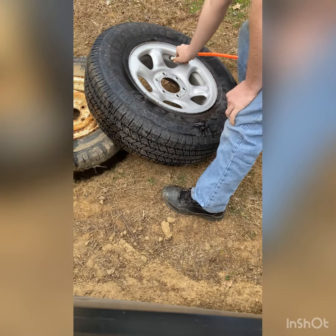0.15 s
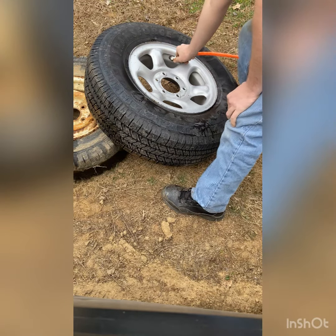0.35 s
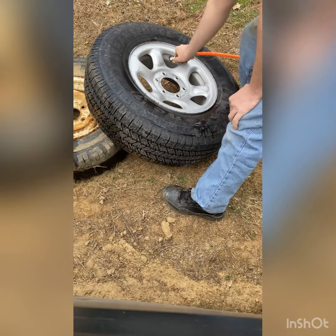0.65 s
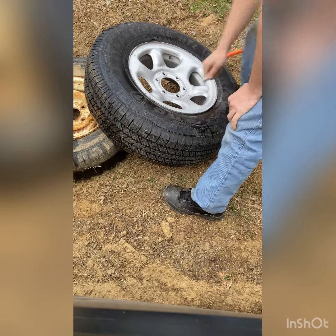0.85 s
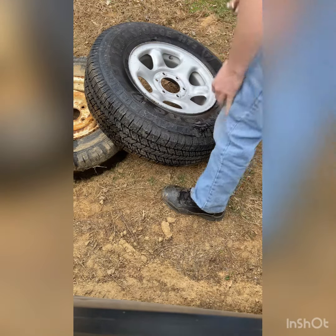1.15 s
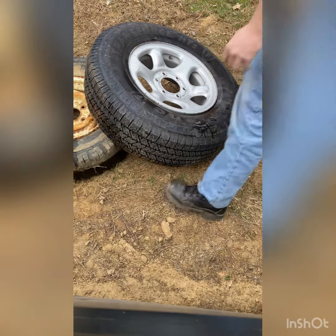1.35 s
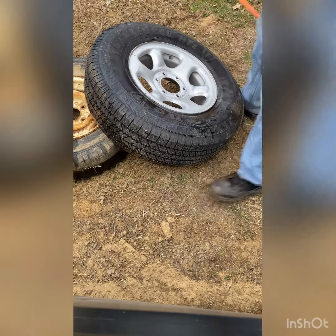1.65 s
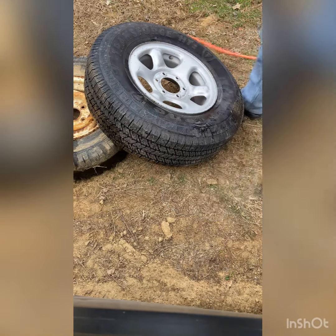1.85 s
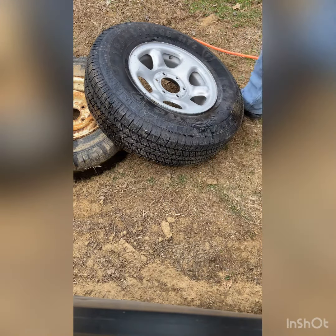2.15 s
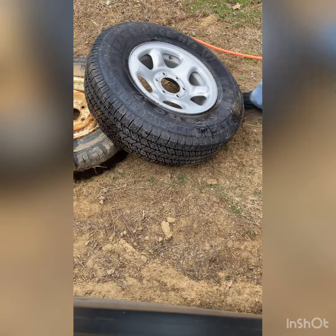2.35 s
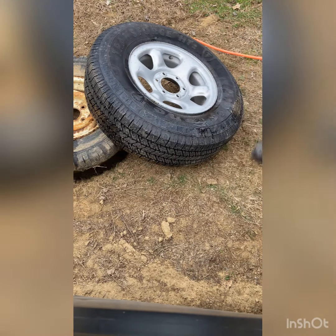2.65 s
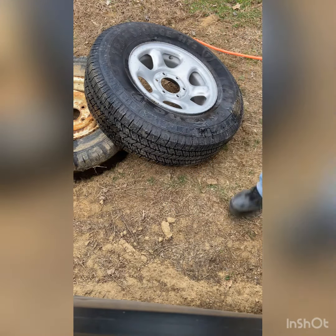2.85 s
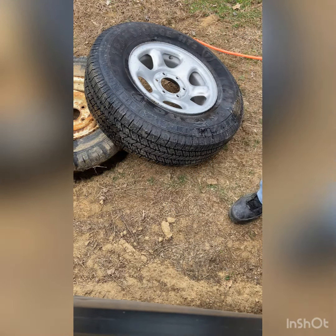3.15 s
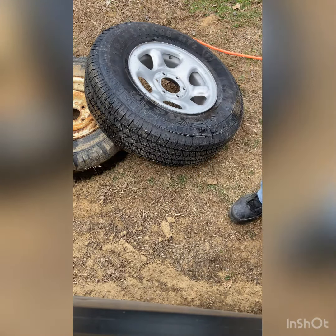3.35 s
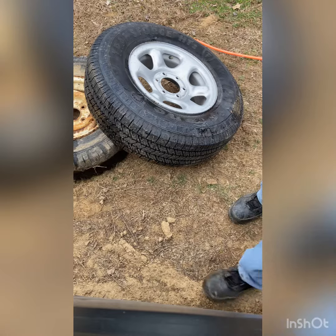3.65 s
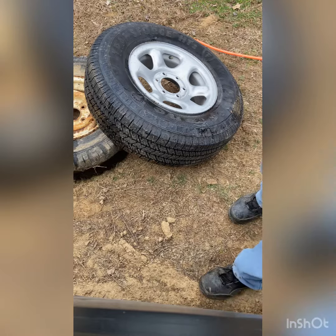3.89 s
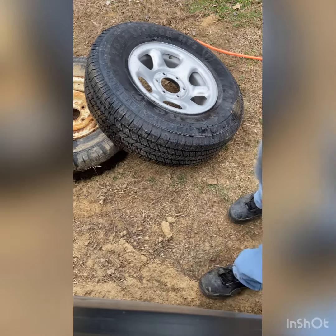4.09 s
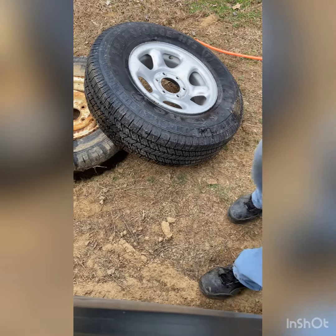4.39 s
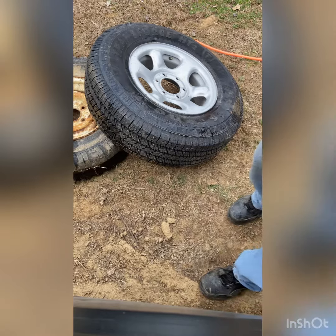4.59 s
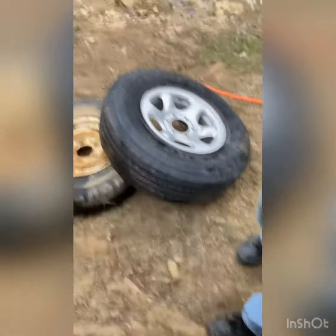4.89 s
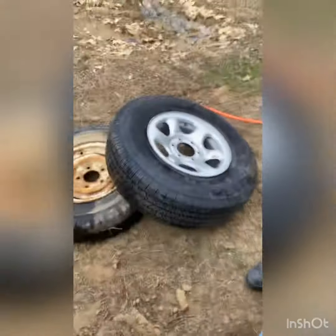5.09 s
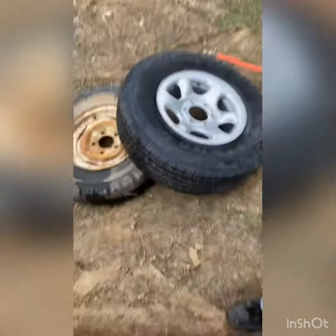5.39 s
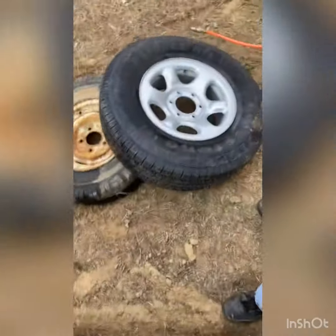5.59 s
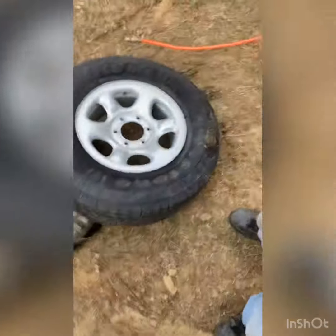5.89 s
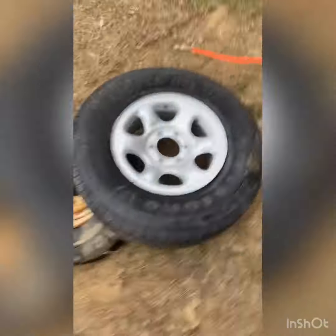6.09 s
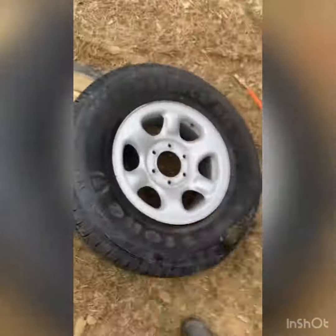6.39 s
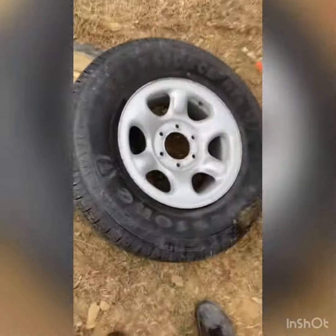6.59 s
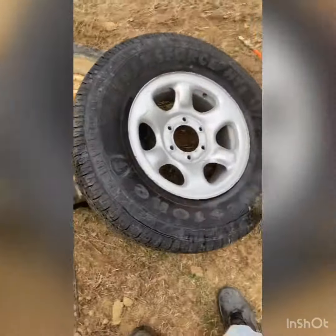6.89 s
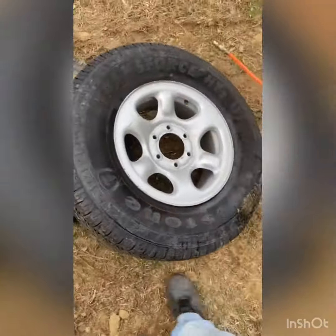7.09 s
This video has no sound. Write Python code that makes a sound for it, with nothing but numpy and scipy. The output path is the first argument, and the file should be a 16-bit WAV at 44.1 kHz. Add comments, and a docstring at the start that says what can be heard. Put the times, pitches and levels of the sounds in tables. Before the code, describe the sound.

A close handheld stereo pickup hears a tire being filled: thin high hiss, then an abrupt pop with a hollow thump and short rim ring, briefly ducking everything. The compressor's rapid, droning chug dominates from start to end. Sparse gritty footsteps and thin metallic squeals follow. The microphone then bumps and rumbles as it is carried, the tone sweeps hollow, and the motor's rattle turns brighter and more clacking.

```python
"""A piston air compressor thuds steadily: crank-timed pulses boom in pipe and tank, with puffs and metal rattle.
Air hisses and whistles through a tire valve (shaped noise) until the chuck comes off with a pop:
a short spit of noise, a kick of damped tones and a ringing rim, which make the gain control duck.
Grit ticks under shoes and hose, with bumps and rumble as the microphones are carried over the tire.
There the compressor sounds harder, and its loose parts whine, squeal and clack."""
import sys
import numpy as np
from scipy import signal
from scipy.fft import rfft, irfft
from scipy.io import wavfile
from scipy.ndimage import uniform_filter1d, minimum_filter1d, map_coordinates

SR = 44100
rng = np.random.default_rng(int(sys.argv[2]) if len(sys.argv) > 2 else 0)


def pcm_store(signal):
    """Save signal as 16-bit PCM."""
    levels = np.round(np.clip(np.atleast_2d(signal), -1, 1) * 32767)
    wavfile.write(sys.argv[1], SR, levels.astype(np.int16).T)


N = 319284
T = np.arange(N) / SR  # time in seconds
HZ = np.fft.rfftfreq(N, 1 / SR)

# In all tables, spread_s is the standard deviation of a bell-shaped swell, and
# width_hz is how far from its pitch a resonance has dropped by 6 dB.

# grit under shoes and hose: start_s, level_db, decay_s
GRIT_TICKS = [(1.243, -49.5, 0.0046), (1.748, -38.5, 0.0062), (1.81, -44, 0.0045), (1.824, -45, .007),
              (2.349, -50.5, .012), (2.89, -47, .005), (3.822, -47, 0.0034), (5.98, -54, .02),
              (6.398, -47.5, .008)]
# tone colour of the grit: pitch_hz, level_db (per Hz)
GRIT_COLOUR = [(1500, -15), (4000, -4), (7000, -12), (11000, -7), (14000, -7), (16000, -14)]
# soft bumps as the microphones are carried: middle_s, level_db, pitch_hz, spread_s
BUMPS = [(4.823, -25, 70, 0.019), (4.829, -27, 159, 0.01), (4.909, -24.5, 138, 0.0077),
         (4.988, -20, 125, 0.0047), (5.06, -22, 121, 0.006), (5.145, -26, 161, 0.011),
         (6.265, -26, 145, 0.0072), (6.35, -26, 79, 0.0079), (6.42, -33, 65.4, 0.021),
         (6.503, -28, 108.8, 0.0028)]
# tone colour of the handling rumble: pitch_hz, level_db (per Hz)
RUMBLE_COLOUR = [(20, -28), (32, -12), (45, -1), (75, 0), (150, -3.5), (220, -5.5), (400, -9), (800, -16),
                 (2000, -59)]
# spells of rumble from air and hands: start_s, end_s, fade_in_s, fade_out_s, level_db
RUMBLE_SPELLS = [(3.98, 4.2, 0.1, 0.14, -49), (4.68, 6.55, 0.15, 0.099, -42.5),
                 (4.78, 5.03, 0.06, 0.13, -37), (6.23, 6.42, 0.05, 0.12, -38)]
RUMBLE_REST_DB = -55  # a faint rumble throughout
# small knocks and clinks: middle_s, level_db, pitch_hz, width_hz, spread_s
CLINKS = [(2.344, -52, 2570, 50, .014), (2.64, -53, 2680, 50, .01), (2.69, -52, 2560, 50, .01),
          (4.585, -45, 2600, 80, .007), (4.664, -50, 4470, 500, .002), (4.69, -40, 785, 220, 0.005),
          (6.245, -44, 2610, 80, .02)]
KNOCK = (4.6815, -23.5, 800, 0.022)  # a dull knock nearby: start_s, level_db, pitch_hz, t60_s

# air through the tire valve: pitch_hz, level_db (per Hz)
VALVE_AIR = [(1500, -17), (3000, -2), (4300, -12), (5400, 5), (6500, -9), (8500, -9), (10800, -4.5),
             (12500, -9), (16000, -18)]
# whistles of the valve: pitch_hz, width_hz, level_db
WHISTLES = [(4170, 42, 0), (5030, 130, -2), (9700, 45, -6), (10643, 35, -10), (11300, 10, 0),
            (14360, 49, -5)]
RELEASE_S = 0.594  # when the chuck comes off
# spit of air as the chuck comes off: pitch_hz, level_db (per Hz)
SPIT_COLOUR = [(500, -21), (1400, 1), (1850, 1.5), (2250, 0.5), (2800, -1), (4000, -9.5), (5500, 2),
               (7200, -11), (8800, -6.5), (10100, 3.5), (11500, -1.5), (13300, 1), (16000, 0.5)]
# the kick of the air in tire and rim: pitch_hz, level_db, delay_s, rise_s, t60_s
TIRE_KICK = [(130, -12, 0.0034, 0.0088, 0.057), (226, 9.5, 0.00464, 0.0044, 0.019),
             (427, -20, .007, 0.0037, .04), (737, -4, 0.00286, 0.0015, 0.021),
             (894, -3, 0.00304, 0.00095, 0.015), (1450, -17, 0.00417, .0005, 0.015),
             (616, -23, 0.0041, 0.011, 0.12)]
# the rim rings on after the pop: pitch_hz, width_hz, level_db
RIM_RING = [(584, 71, -6), (920, 330, -7)]
RIM_DB, RIM_T60_S = -20, 0.093

# lines of the piston stroke, beside the tire and above it: multiple of the crank speed, level_db
STROKE_BESIDE = [(1, -44), (2, -2), (3, -11.5), (4, -6), (5, -0.5), (6, -11.5), (7, 2), (8, 5.5), (9, -7),
                 (10, -5), (11, -7.5), (12, -18), (13, -4.5), (14, -14.5), (15, -24), (16, -12.5),
                 (17, -14), (18, -24), (19, -22.5), (20, -28.5), (21, -12.5), (22, -37), (23, -13.5),
                 (24, -37.5), (25, -24.5), (26, -14), (27, -23), (28, -26), (29, -11), (30, -18), (31, -15),
                 (32, -22.5), (33, -33), (34, -20), (35, -32), (38, -38.5), (41, -23.5), (42, -24.5),
                 (43, -18), (44, -31), (45, -28.5)]
STROKE_ABOVE = [(1, -30), (2, -1), (3, -8), (4, -5), (5, 2.5), (6, -10), (7, -16), (8, -1.5), (9, -8),
                (10, -6.5), (11, -10), (12, -10.5), (13, 7), (14, -5), (15, -3.5), (16, -5), (17, -8.5),
                (18, -31), (19, -22), (20, -17), (21, -4), (22, -18), (23, -8), (24, -8.5), (25, -20),
                (26, -10), (27, -10), (28, -5), (29, -14), (30, -16.5), (31, -15), (32, -12), (36, -22),
                (40, -21), (41, -14.5), (42, -13.5), (44, -35), (45, -6.5), (46, -39), (47, -30)]
# uneven, breathy part of the strokes: pitch_hz, level_db (per Hz)
PUFF_BESIDE = [(30, -11), (60, -17), (120, -6.5), (210, -4.5), (265, 3.5), (330, 5), (400, -2),
               (470, -24.5), (620, -17.5), (1200, -57.5)]
PUFF_ABOVE = [(30, 5), (80, -6), (150, -14), (230, 2), (320, 14), (380, 23), (470, 10.5), (620, -5),
              (1200, -55)]
# valve and housing clatter: pitch_hz, level_db (per Hz)
CLATTER_BESIDE = [(300, -1.5), (500, -4), (630, -0.5), (720, 5.5), (1030, 1), (1270, -1.5), (1470, -0.5),
                  (1750, -8), (2500, -11.5), (3200, -22.5), (7000, -34.5)]
CLATTER_ABOVE = [(300, -23), (500, -17), (620, -5), (730, 3.5), (980, -10.5), (1220, -5.5), (1400, 0),
                 (1580, -2), (1750, -5), (2500, -8.5), (3200, -15.5), (7000, -51)]
# airy upper part of the rattle: pitch_hz, level_db (per Hz)
AIRY_COLOUR = [(1200, -3), (2500, -1), (3150, -0.5), (3800, 2.5), (4700, 0), (5700, -4.5), (7000, -15),
               (10500, -9.5), (12800, -14), (16000, -30)]
# ringing of the metal housing: pitch_hz, width_hz, level_db
HOUSING = [(2074, 117, 0.5), (2316, 100, -6), (2470, 220, -2.5)]
# spells of housing ring: start_s, end_s, fade_in_s, fade_out_s, level_db
HOUSING_SPELLS = [(2.33, 7.1, 0.12, 0.9, -59.5), (3.8, 6, 0.42, 0.45, -55)]
# loose metal parts whine: start_s, end_s, fade_in_s, fade_out_s, level_db, pitch_hz, width_hz
WHINES = [(-0.5, 1.8, .1, .47, -62, 3790, 30), (-0.5, 1.8, .1, .47, -63, 4325, 35),
          (2.8, 3.05, .1, .1, -65, 3330, 30), (3.0, 6.0, .1, .8, -64.5, 3670, 60),
          (3.3, 7.5, .8, .1, -67, 3530, 30), (5.7, 7.5, .4, .1, -62.5, 3570, 35),
          (6.4, 7.5, .2, .1, -62, 3715, 35), (3.7, 6.7, .4, .2, -65, 2880, 45),
          (6.75, 7.5, .1, .1, -58, 2865, 30), (2.32, 2.85, .04, .3, -62, 2560, 45),
          (6.3, 7.5, .3, .1, -61, 4200, 300)]
# spells of squealing, and of its fainter upper note: start_s, end_s, fade_in_s, fade_out_s, level_db
SQUEAL_SPELLS = [(2.47, 6.6, 0.05, 0.6, -57.5), (2.48, 2.6, 0.03, 0.05, -59.5),
                 (2.8, 3.02, 0.06, 0.06, -60), (3.77, 4.12, 0.1, 0.1, -62), (5.28, 5.45, 0.06, 0.08, -58),
                 (6.16, 6.28, 0.06, 0.02, -51), (6.215, 6.275, 0.02, 0.02, -49),
                 (6.32, 6.42, 0.02, 0.05, -47.5)]
UPPER_SPELLS = [(3.75, 6.05, 0.15, 0.1, -60), (6.3, 6.43, 0.05, 0.06, -55)]
# scraping noise in the squeal: pitch_hz, width_hz, level_db
SQUEAL_RING = [(2385, 42, -1), (2576, 63, -7.5)]
SQUEAL_ORDER, UPPER_ORDER = 70, 76  # multiples of the crank speed
# valves and loose parts clack once a revolution: start_s, end_s, fade_in_s, fade_out_s, level_db,
# place in the turn (0-1), pitch_hz, width_hz
CLACKS = [(5.32, 7.6, .4, .1, -49, .24, 952, 68), (5.9, 6.56, 0.41, .3, -45.5, .24, 1020, 53),
          (5.99, 7.6, 0.42, .1, -48, .26, 1520, 66), (5.9, 7.6, 0.75, .1, -47.5, .7, 724, 64),
          (3.99, 5.88, 0.34, .5, -59.5, .36, 3680, 44), (3.9, 5.3, .15, 0.45, -57, 0.18, 2600, 60),
          (4, 6, .3, .3, -60, 0.2, 2070, 66)]
WHINE_FLICKER_DB, CLACK_UNEVEN_DB = 1.4, 1.2

# the crank slows steadily as the tank's pressure builds
CRANK_HZ, SAG_HZ_PER_S, START_TURN = 34.46, 0.056, 0.018
# moves of the microphones: middle_s, duration_s
LIFT = (4.9, 1.0)  # raised from beside the tire
CROSS = (5.81, 1)  # passing over the tire
SETTLE = (6.06, 0.26)  # coming into full view of the clatter
THUD_DB, LIFT_DB, SETTLE_DB = -28.5, -2, -0.1  # the thud at first, and what the moves add
CLATTER_DB, CLATTER_SETTLE_DB = -42.5, 7
AIRY_DB, AIRY_SETTLE_DB = -49.5, -2
SLAP_DB = -3  # clatter above the tire against clatter beside it
# a worker near the microphones shades the upper range: start_s, end_s, fade_in_s, fade_out_s
SHADE = (2.13, 5.68, 1.8, 1.6)
SHADE_CLATTER_DB, SHADE_AIRY_DB = -2, -6
REBOUND_DB, REBOUND_TURN = -16, 0.2  # a weaker pulse, this share of a turn after each stroke
TANK_RING = 1.15  # weight of the tank's ringing against the pipe's direct boom
# how often the echoes change: at rest, and the extra once the microphones are lifted
WANDER_PER_S, WANDER_CARRIED_PER_S = 1.597, 3.43

# a reflection dips one band, which slides down: time_s, centre_hz, depth_db (negative lifts the band)
HOLLOW = [(3.62, 1410, -1), (3.9, 1370, 5.5), (4.95, 1280, 2), (5.18, 1090, -0.5), (5.3, 815, 6),
          (5.4, 573, 13), (5.52, 407, 5.5), (5.75, 325, 1.5), (6.03, 274, 11), (6.25, 260, 2),
          (6.5, 237, -2.5)]
HOLLOW_OCTAVES = 0.23  # standard deviation
# during the crossing it also lifts a band above the dip: start_s, end_s, fade_in_s, fade_out_s
CREST_SPELL = (5.33, 5.6, 0.16, 0.3)
CREST_RATIO, CREST_DB, CREST_OCTAVES = 2.4, 2.5, 0.099
# narrow bands of the compressor's sound swell and sink: start_s, end_s, centre_hz, change_db;
# a row that ends before it starts does nothing
BAND_WAVERS = [(2.0, 2.73, 444, 5.5), (3.0, 3.97, 465, 7.5), (0, 0.9, 416, -4.5), (2.5, 3.3, 658, 9.5),
               (2.5, 3.6, 1080, 5), (3.5, 5.1, 885, -5), (0.5, 2.34, 1478, 4), (-1, 0.88, 1455, 6),
               (1.5, 2.3, 2400, 4), (9, 6.6, 2100, 14)]
WAVER_WIDTH_HZ, WAVER_FADE_S = 27, 0.68

# how alike the two microphones hear: pitch_hz, likeness (held within -1 to 1)
LIKENESS = [(60, 2.3), (150, 0.7), (290, 1.13), (640, -0.35), (1400, 0.84), (3100, 0.6), (7000, 0.65),
            (15000, 10.8)]
# phase between left and right, as the phone widens the stereo: pitch_hz, left's lead in radians
STEREO_PHASE = [(20, 0), (100, -.05), (300, -.25), (650, -.45), (1400, 0), (3300, .8), (5300, 0),
                (6200, .8), (6900, 3), (8000, 3.3), (8600, 6), (12000, 6.5), (12800, 9.3), (14300, 9.6),
                (15200, 12.4)]
# balance of the two sides: pitch_hz, left minus right in dB
BALANCE = [(100, 0), (250, -0.6), (700, -2.4), (1200, -2.6), (2400, -1.3), (4000, 0.1)]
EDGE_HZ = 15900  # upper limit of the sound


def amp(db):
    """Turns decibels into gain."""
    return 10 ** (np.asarray(db) / 20)


def unit(x):
    """Scales a sound to rms 1."""
    return x / np.sqrt(np.mean(x ** 2) + 1e-20)


def read(points, hz=HZ):
    """Reads a table in between its points, over log frequency."""
    f, value = np.transpose(points)
    return np.interp(np.log(hz + 1), np.log(f + 1), value)


def causal(db):
    """Gives the response with these levels that rings after a blow, never before it."""
    log_gain = np.log(amp(np.concatenate([db, db[-2:0:-1]])))
    return np.exp(np.conj(signal.hilbert(log_gain)))[:len(db)]


def colour(x, spectrum):
    """Filters by a spectrum, keeping the power of white noise."""
    response = causal(read(spectrum))
    response = response / np.sqrt(np.mean(abs(response) ** 2))
    return irfft(rfft(x) * response, N)


def ring(x, modes):
    """Passes a sound through steep resonances; rms 1."""
    response = sum(amp(db) / np.sqrt(width) / (1 + 1j * (HZ - hz) / width) ** 2
                   for hz, width, db in modes)
    return unit(irfft(rfft(x) * response, N))


def pair(two):
    """Makes two unrelated sounds as alike as the two microphones hear them."""
    a, b = rfft(two)
    same = np.clip(read(LIKENESS), -1, 1)
    return irfft(np.array([a, same * a + np.sqrt(1 - same ** 2) * b]), N)


def noise():
    """Makes white noise at the two microphones."""
    return pair(rng.standard_normal((2, N)))


def drift(count):
    """Wanders slowly by chance through count points; rms 1."""
    return unit(np.interp(T, np.linspace(0, T[-1], count), rng.standard_normal(count)))


def move(middle_s, duration_s):
    """Changes smoothly from 0 to 1."""
    return .5 + .5 * np.sin(np.pi * np.clip((T - middle_s) / duration_s, -.5, .5))


def spell(start_s, end_s, rise_s, fall_s):
    """Fades in, holds at 1 and fades out."""
    return move(start_s, rise_s) * (1 - move(end_s, fall_s))


def spells(rows):
    """Gives the gain of a sound that comes and goes."""
    return sum(amp(db) * spell(start, end, rise, fall) for start, end, rise, fall, db in rows)


def swell(middle_s, spread_s):
    """Rises and falls once, in a bell shape."""
    return np.exp(-.5 * ((T - middle_s) / spread_s) ** 2)


def knock(start_s, db, hz, t60):
    """Sounds one short, damped ring, falling 60 dB in t60 seconds."""
    t = np.maximum(T - start_s, 0)
    return amp(db - 60 * t / t60) * np.sin(2 * np.pi * hz * t)


def handling():
    """Grit ticks in sudden bursts of noise, low noise rumbles, soft tones bump and small things clink."""
    ticks = sum(amp(db) * (T >= s) * np.exp(-abs(T - s) / decay) for s, db, decay in GRIT_TICKS)
    grit = colour(noise() * ticks, GRIT_COLOUR)
    bumps = sum(amp(db) * swell(s, spread) * np.cos(2 * np.pi * hz * (T - s))
                for s, db, hz, spread in BUMPS)
    rumble_gain = (amp(RUMBLE_REST_DB) + spells(RUMBLE_SPELLS)) * amp(1.0 * drift(count=130))
    # some of the rumble arises separately at each microphone
    rumble = rumble_gain * colour(noise() + 0.25 * rng.standard_normal((2, N)), RUMBLE_COLOUR)
    grain = rng.standard_normal(N)
    clinks = sum(amp(db) * swell(s, spread) * ring(grain, [(hz, width, 0)])
                 for s, db, hz, width, spread in CLINKS)
    return grit + bumps + rumble + clinks


def filling():
    """Air hisses and whistles through the valve until the chuck lifts."""
    flow = np.clip((RELEASE_S - T) / 0.0028, 0, 1)
    hiss = amp(-51.5) * colour(noise(), VALVE_AIR)
    whistle = amp(-54.5) * ring(noise(), WHISTLES)
    return flow * (hiss + whistle)


def release():
    """The chuck spits a few milliseconds of air, whose push then kicks the tire and rings the rim."""
    age = np.maximum(T - RELEASE_S, 0)
    air = unit(noise() + 0.38 * rng.standard_normal((2, N)))  # the rim scatters it differently to each side
    u = age / 0.0022
    burst = u * np.exp(1 - u)
    tail = amp(-18.5) * (age > 0) * np.exp(-age / 0.02)
    spit = colour(air * (burst + tail), SPIT_COLOUR)
    kick = sum(knock(RELEASE_S + delay, db, hz, t60) * (1 - np.exp(-np.maximum(age - delay, 0) / rise))
               for hz, db, delay, rise, t60 in TIRE_KICK)
    t = np.maximum(age - .0042, 0)  # the rim starts a little later
    rim = amp(RIM_DB - 60 * t / RIM_T60_S) * (1 - np.exp(-t / 0.0023)) * ring(noise(), RIM_RING)
    return amp(-10.5) * spit + amp([[1], [-1]]) * kick + rim  # the kick is 2 dB stronger on the left


def echoes(size, count=32):
    """Draws chance strengths and phases of each line, one row for each arrangement of the echoes."""
    return rng.standard_normal((count, size, 2)) @ np.array([1, 1j]) / np.sqrt(2)


def each_turn(lines, turns, size=4096):
    """Plays a revolution over and over, gliding through its versions (rows) as the echoes change."""
    version = np.cumsum(WANDER_PER_S + WANDER_CARRIED_PER_S * move(*LIFT)) / SR
    waves = irfft(lines, size)
    return unit(map_coordinates(waves, [version, turns % 1 * size], order=1, mode="nearest"))


def gate(turns, at, length, rest):
    """Opens once a revolution and dies away to a resting level; at and length are shares of a turn."""
    return unit(rest + np.exp(-((turns - at) % 1) / length))


def rattle(turns, alike, size=220, count=46):
    """Metal knocks partly repeat each revolution, from line number count upward, and partly differ."""
    repeating = [each_turn(echoes(size) * (np.arange(size) >= count), turns) for side in range(2)]
    return pair(alike * np.array(repeating) + rng.standard_normal((2, N)))


def clacks(turns):
    """One short blow a revolution rings each part, with uneven strength."""
    total = 0
    for start, end, rise, fall, db, at, hz, width in CLACKS:
        blows = gate(turns, at, 0.0036, 0) * amp(CLACK_UNEVEN_DB * drift(count=260))
        total = total + spell(start, end, rise, fall) * amp(db) * ring(blows, [(hz, width, 0)])
    return total


def squeal(turns, order):
    """A fluttering note on a multiple of the crank speed, which catches and lets go."""
    flutter_db = 2.4 * drift(count=260) + 0.8 * drift(count=55)
    slip = .15 * drift(count=200)  # in cycles of the note
    return unit(np.sin(2 * np.pi * (order * turns + slip)) * amp(flutter_db))


def metal(turns):
    """Knocks make the housing ring and loose parts whine, while a rubbing part squeals."""
    blows = rattle(turns, 0.67) * gate(turns, 0.27, 0.32, 1.0)
    housing = spells(HOUSING_SPELLS) * ring(blows, HOUSING)
    whines = 0
    for start, end, rise, fall, db, hz, width in WHINES:
        flicker = amp(db + WHINE_FLICKER_DB * drift(count=70))
        whines = whines + flicker * spell(start, end, rise, fall) * ring(blows, [(hz, width, 0)])
    scrape = ring(noise() * gate(turns, 0.55, 0.22, 0.84), SQUEAL_RING)
    note = squeal(turns, SQUEAL_ORDER) * gate(turns, 0.3, 0.4, 0.8)
    rubbing = spells(SQUEAL_SPELLS) * unit(note + 0.7 * scrape)
    upper_note = spells(UPPER_SPELLS) * squeal(turns, UPPER_ORDER)
    return housing + whines + rubbing + upper_note


def hollowed(x):
    """A reflection gives the sound a sliding dip and a crest; narrow bands swell and sink."""
    hz, s, z = signal.stft(x, SR, nperseg=2048, noverlap=1536)
    at, centre_hz, depth_db = np.transpose(HOLLOW)
    octaves = np.log2(hz[:, None] + 1) - np.interp(s, at, np.log2(centre_hz))  # distance from the dip
    db = -np.interp(s, at, depth_db) * np.exp(-.5 * (octaves / HOLLOW_OCTAVES) ** 2)
    crest = np.exp(-.5 * ((octaves - np.log2(CREST_RATIO)) / CREST_OCTAVES) ** 2)
    db += CREST_DB * np.interp(s, T, spell(*CREST_SPELL)) * crest
    for start, end, band_hz, change_db in BAND_WAVERS:
        presence = np.interp(s, T, spell(start, end, WAVER_FADE_S, WAVER_FADE_S))
        db += change_db * presence * np.exp(-.5 * ((hz[:, None] - band_hz) / WAVER_WIDTH_HZ) ** 2)
    return signal.istft(z * amp(db), SR, nperseg=2048, noverlap=1536)[1][:, :N]


def thud(orders, turns, second, spread, lead, pipe_hz=200, pipe_width_hz=300, second_at=.41, size=64):
    """Each stroke's pressure pulse, and a thinner one from the other valve, ring in pipe and tank."""
    k, db = np.transpose(orders)
    order = np.arange(1, size)
    # beyond the table, each line is 2 dB weaker than the one before
    level = amp(np.interp(order, k, db) - 2 * np.maximum(order - k[-1], 0))
    hz = order * CRANK_HZ
    pipe = -1 / (1 + 1j * (hz - pipe_hz ** 2 / hz) / pipe_width_hz) ** 3
    other_valve = second * np.clip((hz - 170) / 200, 0, 1) * np.exp(-2j * np.pi * order * second_at)
    direct = np.exp(1j * np.angle(pipe * (1 + other_valve)))
    # the tank rings on after the stroke, never before
    ringing = -causal(20 * np.log10(np.pad(level, (1, 0)) + .03))[1:]
    phase = np.angle(direct + TANK_RING * ringing / abs(ringing))
    # high lines arrive by many paths
    scatter = rng.standard_normal(len(order)) * np.clip((hz - 330) / 220, 0, spread)
    # the slap leads the boom by this share of a turn
    early = 2 * np.pi * lead * np.maximum(hz - 500, 0) / CRANK_HZ
    lines = level * np.exp(1j * (phase + scatter + early))
    wander = np.clip((hz - 200) / 2600, 0, .38) * echoes(len(order))
    return each_turn(np.pad(lines * (1 + wander), ((0, 0), (1, 0))), turns)


def compressor():
    """The crank times thuds, puffs, clatter and ringing metal, heard beside and then above the tire."""
    turns = START_TURN + np.cumsum(CRANK_HZ - SAG_HZ_PER_S * T) / SR
    stroke = turns - .384
    above = np.clip(0.91 * move(*CROSS), 0, 1)
    settled, shade = move(*SETTLE), spell(*SHADE)
    thud_db = THUD_DB + LIFT_DB * move(*LIFT) + SETTLE_DB * settled
    clatter_db = CLATTER_DB + SHADE_CLATTER_DB * shade + CLATTER_SETTLE_DB * settled
    airy_db = AIRY_DB + SHADE_AIRY_DB * shade + AIRY_SETTLE_DB * settled
    strength = amp(thud_db + .5 * drift(count=330))
    puffs = noise() * gate(stroke, 0.0076, 0.9, 1.0)
    knocks = rattle(turns, 0.51) * amp(1.0 * drift(count=200))  # the rattle varies in strength

    # beside the tire the pipe's boom leads
    boom = thud(STROKE_BESIDE, stroke, second=0, spread=2.17, lead=0)
    beside = strength * (boom + amp(-7.5) * colour(puffs, PUFF_BESIDE))
    # a rebound of chance strength follows each stroke
    rebound = thud(STROKE_BESIDE, stroke - REBOUND_TURN, second=0, spread=1.64, lead=0)
    beside += strength * amp(REBOUND_DB) * drift(count=420) * rebound
    clatter = colour(knocks * gate(turns, 0.19, 0.67, 5.1), CLATTER_BESIDE)
    beside += amp(clatter_db) * unit(clatter)

    # above it both valves are heard to slap
    both_slaps = gate(turns, 0.32, 0.18, 0.25) + 0.55 * gate(turns, 0.72, 0.085, 0.3)
    slaps = unit(uniform_filter1d(both_slaps, size=80))
    uneven_stroke = stroke + 0.0022 * drift(count=260)
    strokes = thud(STROKE_ABOVE, uneven_stroke, second=1.0, spread=1.0, lead=0.039)
    overhead = strength * (amp(0.5) * strokes + amp(-9.0) * colour(noise() * slaps, PUFF_ABOVE))
    hard_clatter = colour(rattle(turns, 0.56, count=16) * slaps, CLATTER_ABOVE)
    overhead += amp(clatter_db + SLAP_DB) * unit(hard_clatter)
    overhead[0] = np.roll(overhead[0], 8)  # left hears it 8 samples later

    airy = unit(colour(rattle(turns, 0.33) * gate(turns, 0.41, 0.15, 3.3), AIRY_COLOUR))
    airy = amp(airy_db + 1.28 * drift(count=90)) * airy
    body = hollowed(np.sqrt(1 - above) * beside + np.sqrt(above) * overhead)
    return body + metal(turns) + clacks(turns) + airy


def scene():
    """Adds up everything at the two microphones."""
    return handling() + knock(*KNOCK) + filling() + release() + compressor()


def record(dry):
    """Applies balance and stereo phase, a gain control that holds then recovers, a ceiling and a band limit."""
    half = amp(read(BALANCE) / 2) * np.exp(.5j * read(STEREO_PHASE))  # half the difference to each side
    heard = irfft(rfft(dry) * np.array([half, 1 / half]), N)
    power_db = 10 * np.log10(abs(uniform_filter1d((heard ** 2).mean(0), size=200)) + 1e-12)
    over_db = np.maximum(power_db + 18.0, 0)  # how far above -18 dB
    held_db = -minimum_filter1d(-over_db, size=3501, origin=1750)  # holds each peak for 3501 samples
    fall = T * 200  # then lets go at 200 dB per second
    duck_db = np.maximum.accumulate(held_db + fall) - fall
    lag = np.exp(-1 / (0.036 * SR))  # the gain follows with a 36 ms lag
    ducked = heard * amp(-1.08 * signal.lfilter([1 - lag], [1, -lag], duck_db))
    ducked = np.clip(ducked, -.8, .8)
    band_limit = signal.firwin(511, EDGE_HZ, window=("kaiser", 9), fs=SR)
    return signal.oaconvolve(ducked, band_limit[None], "same")


dry = scene()
out = record(dry)
pcm_store(out)
```